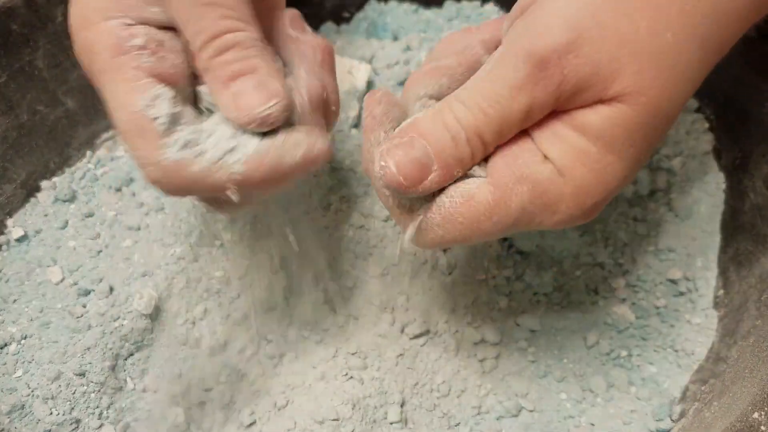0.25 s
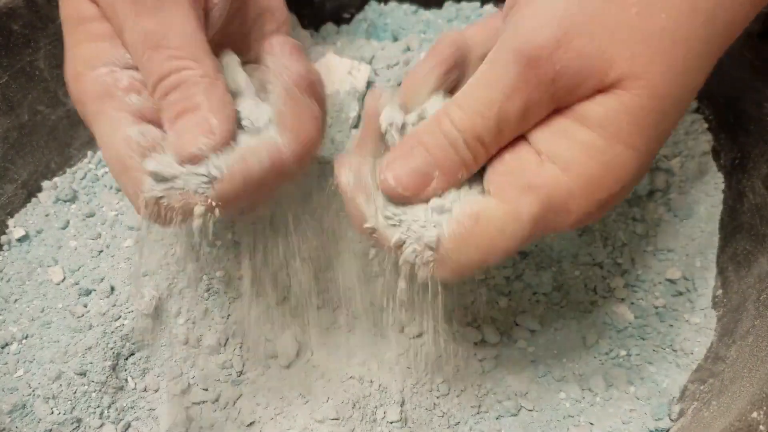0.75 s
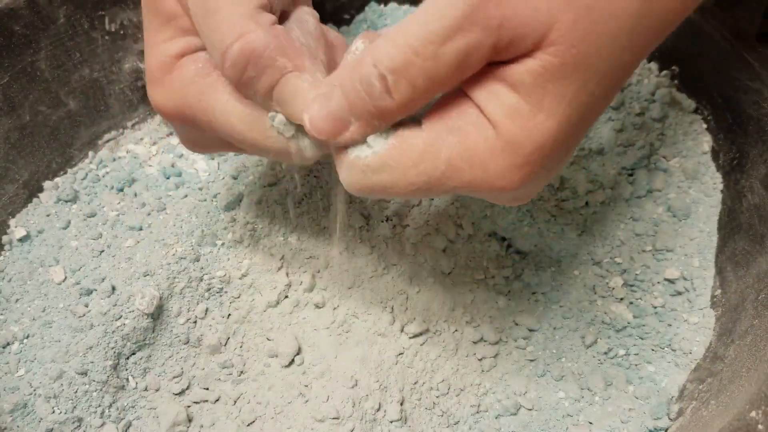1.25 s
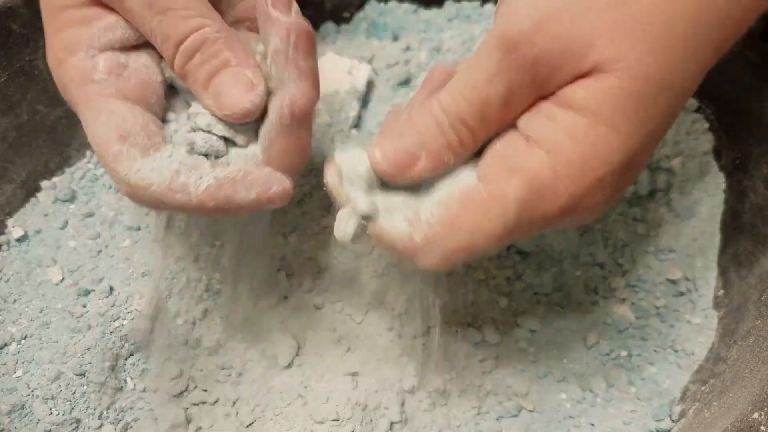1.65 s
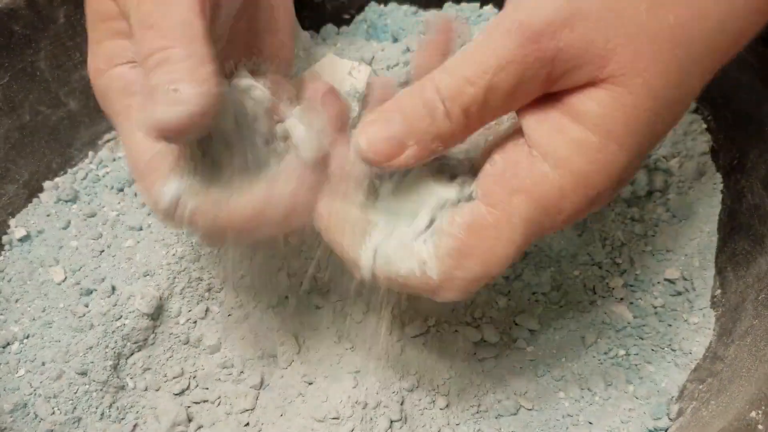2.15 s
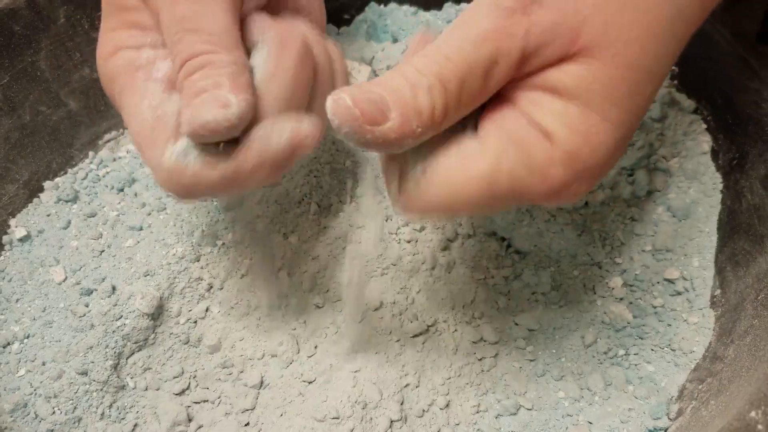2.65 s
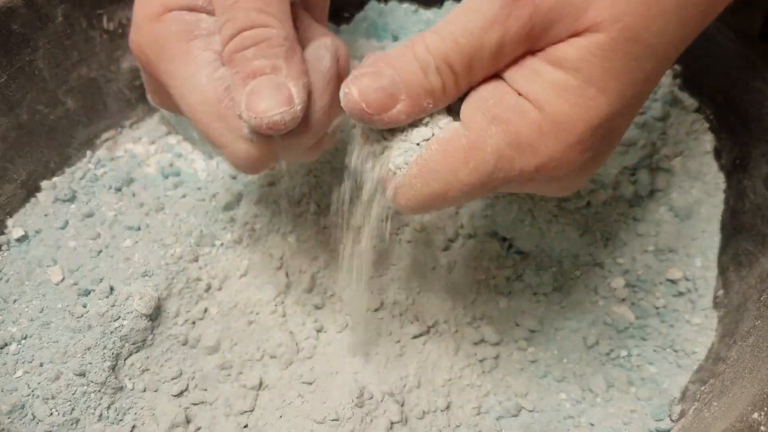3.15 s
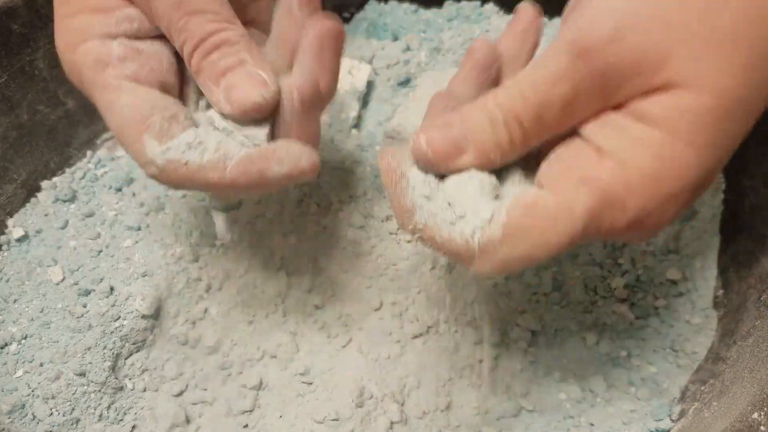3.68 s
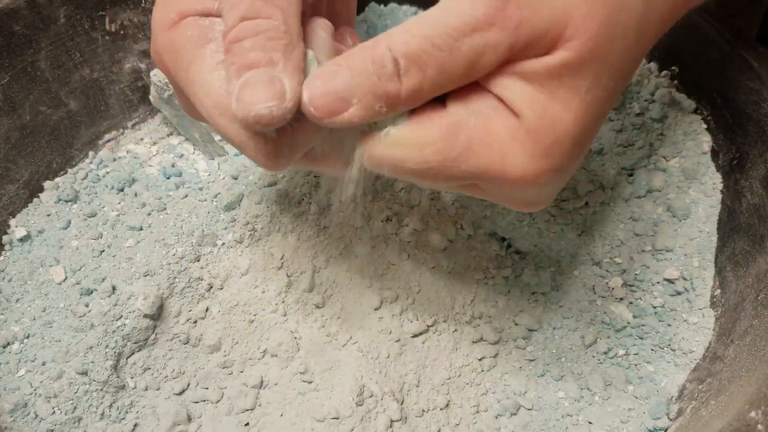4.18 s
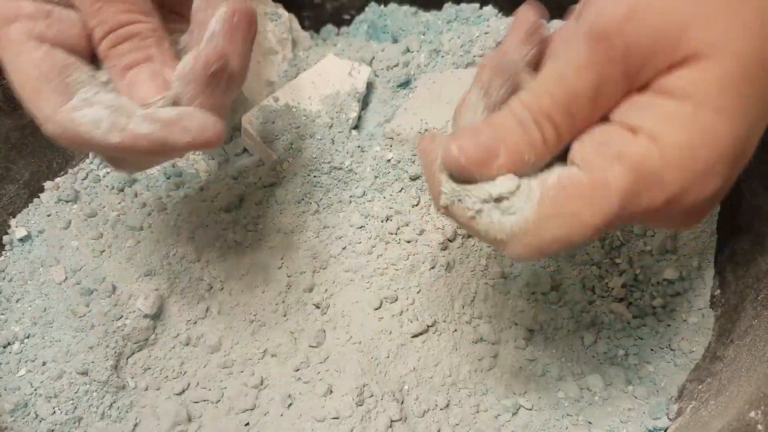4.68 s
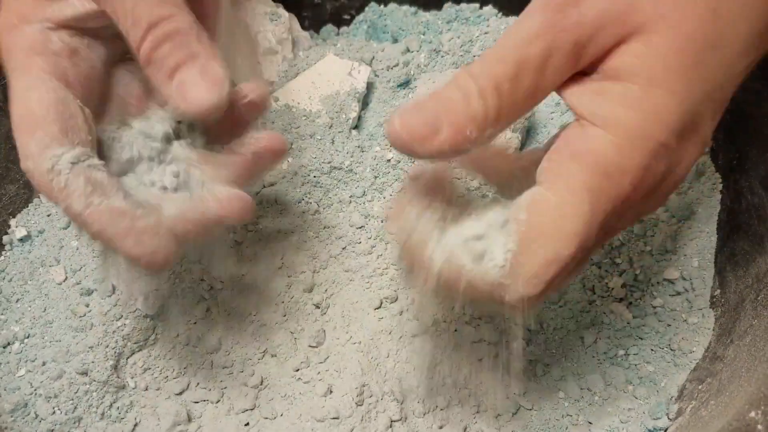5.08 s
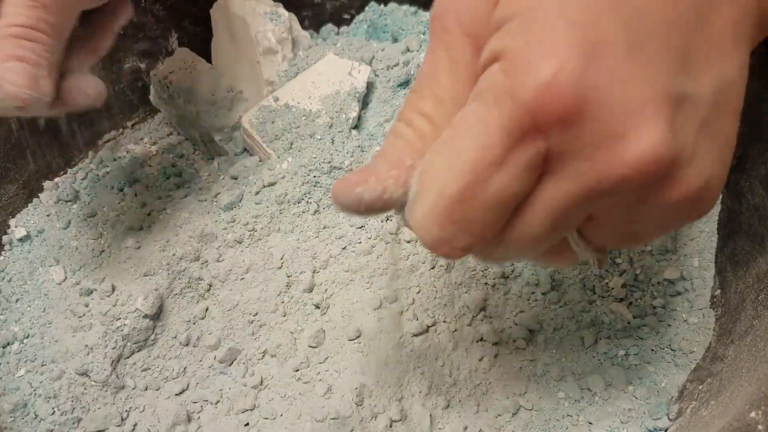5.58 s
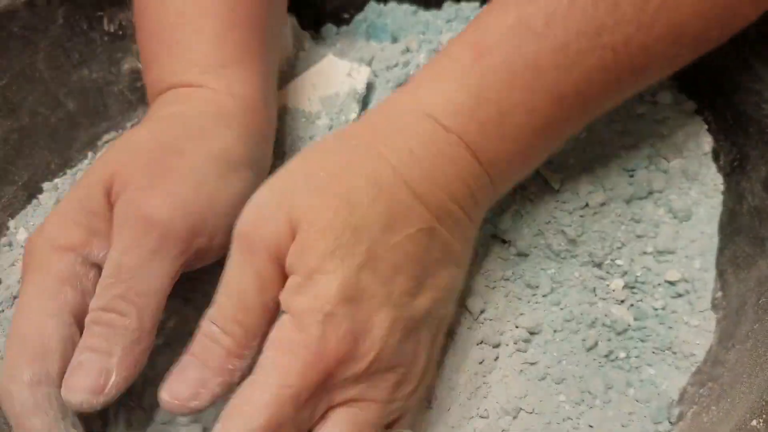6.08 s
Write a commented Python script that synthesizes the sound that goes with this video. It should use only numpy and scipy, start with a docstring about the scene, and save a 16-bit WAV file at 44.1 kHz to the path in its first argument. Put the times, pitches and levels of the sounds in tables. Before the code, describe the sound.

Dry chalky lumps snap and crumble between fingers over a bowl, with gritty crackles and sifting powder, ending in a broad, low scraping sweep.

```python
"""Chalk crumbled over a bowl

Hands crumble soft chalk close to a small microphone in a small room. Lumps snap as noise through a resonance,
each answered by a fading smear of noise; crumbs tick and crackle as short bursts and decaying tones.
Grinding, sifting, settling and bowl rumble are gritty coloured noise under level curves; bumps are decaying sines.
At the end both palms plough through the heap, stirring up hiss and rumble.
"""
import sys
import numpy as np
from scipy import signal
from scipy.fft import rfft, irfft, next_fast_len
from scipy.io import wavfile
from scipy.ndimage import map_coordinates

SR = 44100
rng = np.random.default_rng(int(sys.argv[2]) if len(sys.argv) > 2 else 0)


def bounce(signal):
    """Save signal as a 16-bit WAV file at the path given by the first command-line argument."""
    frames = np.transpose(np.atleast_2d(signal))
    limited = np.clip(frames, -1, 1)
    pcm = np.round(limited * 32767).astype(np.int16)
    wavfile.write(sys.argv[1], SR, pcm)


N = 279153


def amp(db):
    """Decibels to gain."""
    return 10 ** (np.asarray(db) / 20)


def unit(x):
    """Scale to rms 1."""
    return x / np.sqrt(np.mean(x ** 2) + 1e-20)


def peak(x):
    """Scale each row to peak 1."""
    return x / np.abs(x).max(axis=1, keepdims=True)


def gain_at(points, hz):
    """Gain of (Hz, dB) points, interpolated over log frequency."""
    point_hz, db = np.transpose(points)
    return amp(np.interp(np.log(hz + 1), np.log(point_hz + 1), db))


def causal(points):
    """Minimum-phase response with the gain of the points: nothing sounds before its cause."""
    def response(hz):
        cepstrum = irfft(np.log(gain_at(points, hz) + 1e-6))
        half = len(cepstrum) // 2
        fold = np.r_[1, 2 * np.ones(half - 1), 1, np.zeros(len(cepstrum) - half - 1)]
        return np.exp(rfft(cepstrum * fold))
    return response


def resonance(hz, width_hz):
    """Band-pass resonance applied twice: steep flanks, ringing of a few cycles."""
    def response(f):
        damping = 1j * f * width_hz
        return (damping / (hz ** 2 - f * f + damping)) ** 2
    return response


def filtered(x, response):
    """Apply a frequency response along the last axis, zero-padded."""
    size = 2 * next_fast_len(x.shape[-1] // 2 + 2048)
    spectrum = rfft(x, size) * response(np.fft.rfftfreq(size, 1 / SR))
    return irfft(spectrum, size)[..., :x.shape[-1]]


def curves(rows):
    """One value per sample for each column after the time."""
    time_s, *columns = np.transpose(rows)
    return [np.interp(np.arange(N) / SR, time_s, column) for column in columns]


def wobble(knots_per_s):
    """Smooth random curve through normal-distributed knots."""
    knots = rng.standard_normal(int(N * knots_per_s / SR) + 4)
    return map_coordinates(knots, [np.arange(N) * knots_per_s / SR])


def place(rows, times_s):
    """Add each row of sound at its time."""
    out = np.zeros(N + rows.shape[1])
    for row, time_s in zip(rows, times_s):
        out[round(time_s * SR):][:len(row)] += row
    return out[:N]


def gritty(spectrum, per_s, spread_db, grain_db, life_s, wobble_db):
    """Coloured friction noise of rms 1 whose level leaps briefly as single crumbs break."""
    grain_level_db = grain_db + spread_db * np.minimum(rng.exponential(size=N), 3)
    breaks = (rng.random(N) < per_s / SR) * amp(grain_level_db)
    leaps = signal.lfilter([1], [1, -np.exp(-1 / (life_s * SR))], breaks)
    drag = amp(wobble_db * wobble(30))
    noise = rng.standard_normal(N) * (drag + leaps)
    return unit(filtered(noise, lambda hz: gain_at(spectrum, hz)))


# both palms sweeping the heap: (time [s], level [dB])
PLOUGH_LEVELS = [(5.77, -79), (5.816, -34), (5.888, -35.5), (5.99, -36), (6.062, -39.5), (6.136, -36.5),
                 (6.252, -39), (6.274, -52), (6.33, -51)]


def plough_gain():
    """Gain of the palms' sweep, silent until they land."""
    landed = np.arange(N) > PLOUGH_LEVELS[0][0] * SR
    return landed * amp(curves(PLOUGH_LEVELS)[0])


# bowl shaking under the fingers: (time [s], level [dB])
RUMBLE_LEVELS = [(0.0, -55), (0.35, -51), (0.97, -62), (1.29, -61), (1.5, -55), (2.03, -53.5),
                 (2.17, -59.5), (2.43, -49.5), (2.7, -58), (3.31, -56), (4.0, -57.5), (4.2, -63),
                 (4.74, -53), (4.95, -63.5), (5.3, -51), (5.7, -59.5), (6.33, -61)]
# bowl shake spectrum: (frequency [Hz], relative density [dB])
BOWL_SPECTRUM = [(26, 6), (45, 0), (65, -0.5), (119, 7.5), (195, -6.5), (273, -7), (337, -3.5), (401, -19),
                 (450, -22.5), (580, -45), (990, -120)]


def rumble():
    """Low shaking of the bowl under the fingers, plus the shake stirred up by the sweep."""
    shake = gritty(BOWL_SPECTRUM, per_s=5, spread_db=2, grain_db=2, life_s=.015, wobble_db=1)
    plough_shake_db = -3.5  # re sweep level
    return (amp(curves(RUMBLE_LEVELS)[0]) + amp(plough_shake_db) * plough_gain()) * shake


# powder spurts as the fingers open: (time of the peak [s], level [dB], fall to 1/e [s])
SPURT_EVENTS = [(0.15, -62, 0.027), (0.267, -47, 0.011), (0.336, -51, 0.069), (0.409, -45.5, 0.027),
                (0.63, -48, .06), (1.29, -49.5, 0.039), (1.357, -53.5, .025), (1.736, -51, 0.024),
                (1.796, -47, 0.0096), (1.908, -57, 0.033), (2.0, -46, .06), (2.12, -49.5, 0.053),
                (2.33, -53.5, 0.031), (2.425, -45, 0.016), (2.704, -54.5, .03), (3.11, -66, 0.016),
                (3.242, -49.5, 0.021), (3.517, -50.5, 0.019), (3.646, -54, 0.011), (3.74, -52, 0.057),
                (3.973, -41.5, 0.013), (4.182, -54.5, .03), (4.26, -58.5, .05), (4.459, -48.5, 0.042),
                (4.682, -56, 0.079), (4.865, -57, 0.03), (4.957, -49.5, 0.051), (5.058, -53, 0.044),
                (5.617, -45.5, 0.012), (5.697, -54, 0.029)]


def spurt_gain():
    """Gain of the powder's spurts: each swells to its peak and thins out more slowly."""
    time_s, db, fall_s = np.transpose(SPURT_EVENTS)[:, :, None]
    lag_s = np.arange(N) / SR - time_s
    width_s = np.where(lag_s < 0, 0.29 * fall_s, fall_s)
    return np.sum(amp(db) * np.exp(-(lag_s / width_s) ** 2), axis=0)


# trickle of powder, swelling and thinning: (time [s], level [dB])
TRICKLE_LEVELS = [(0.0, -59.5), (.28, -59), (0.55, -55), (0.74, -59), (1.0, -63), (1.22, -75),
                  (1.46, -63.5), (1.74, -59), (1.97, -54.5), (2.26, -63), (2.45, -54.5), (2.8, -58.5),
                  (3.45, -57), (3.6, -65), (3.86, -57), (4.09, -69), (4.3, -59), (4.56, -64.5), (4.81, -53),
                  (5.02, -53.5), (5.15, -68), (5.24, -55.5), (5.5, -56.5), (5.57, -64.5), (5.67, -50.5),
                  (5.77, -58.5), (6.33, -74)]
# sifting hiss spectrum, also colours the ticks: (frequency [Hz], relative density [dB])
SIFT_SPECTRUM = [(2060, -3.5), (3500, -3.5), (4840, -4.5), (5260, -7.5), (5900, -9), (8310, -18.5),
                 (10900, -6), (11700, -6), (14200, -12), (16000, -20)]


def sifting():
    """Fine powder hiss: trickle, spurts and the hiss stirred up by the sweep share one noise."""
    hiss = gritty(SIFT_SPECTRUM, per_s=130, spread_db=4.0, grain_db=0.0, life_s=0.00057, wobble_db=-1.0)
    plough_hiss_db = -9  # re sweep level
    stirred = spurt_gain() + amp(plough_hiss_db) * plough_gain()
    return np.hypot(amp(curves(TRICKLE_LEVELS)[0]), stirred) * hiss


# fingers at work: (time [s], crumbs grinding level [dB], powder settling level [dB])
HAND_LEVELS = [(0.0, -56.5, -57.5), (0.18, -58, -60.5), (0.33, -48, -48), (0.5, -65, -46),
               (0.62, -64, -62.5), (0.9, -56.5, -56), (1.12, -71, -64.5), (1.78, -65.5, -62),
               (1.92, -44.5, -47.5), (2.23, -60.5, -55.5), (2.69, -59.5, -62.5), (3.14, -60.5, -53.5),
               (4.22, -65.5, -67.5), (4.66, -66, -56), (4.81, -51.5, -51.5), (5.0, -62, -61),
               (5.72, -57, -60.5), (5.85, -93, -79)]
# settling spectrum: (frequency [Hz], relative density [dB])
HEAP_SPECTRUM = [(210, -31), (350, 3), (507, -11), (649, 0.5), (710, -6.5), (1050, -7), (1800, -7),
                 (2040, -11.5), (2500, -13.5), (3250, -5.5), (5500, -120)]


def settling():
    """Powder settles on the heap: sparse, longer grains of low-pitched noise."""
    noise = gritty(HEAP_SPECTRUM, per_s=34, spread_db=1.5, grain_db=8.5, life_s=0.0038, wobble_db=4.0)
    return amp(curves(HAND_LEVELS)[1]) * noise


# grinding spectrum: (frequency [Hz], relative density [dB])
GRIND_SPECTRUM = [(710, -44), (1200, -50), (1790, 7), (2130, -9), (2320, 8), (2660, 10), (3670, -21),
                  (4680, -5.5), (6000, -21), (7800, -19), (13200, -120)]


def grinding():
    """Crumbs grind between the fingers: friction noise with short grains."""
    noise = gritty(GRIND_SPECTRUM, per_s=120, spread_db=4.0, grain_db=8, life_s=0.001, wobble_db=2.5)
    return amp(curves(HAND_LEVELS)[0]) * noise


# sweep spectrum: (frequency [Hz], relative density [dB])
PLOUGH_SPECTRUM = [(210, -21), (350, -8), (415, -15.5), (546, 0.5), (799, -2.5), (1110, 0), (1460, -6),
                   (1820, -4), (3690, -13.5), (4800, -18.5), (8000, -29), (10400, -47), (17600, -120)]


def ploughing():
    """Both palms sweep the heap: broad friction noise of dense, weak grains."""
    noise = gritty(PLOUGH_SPECTRUM, per_s=270, spread_db=1.0, grain_db=-4.5, life_s=0.00092, wobble_db=0.7)
    return plough_gain() * noise


def crumbs():
    """Lesser crumbs crack at random, level following the grinding, each ringing a few cycles at its pitch."""
    per_s, over_grind_db, spread_db = 40, 13, 4
    when, size, tone = rng.random((250, 3)).T[:, :, None]
    time_s = np.cumsum(-np.log(when + 1e-9), axis=0) / per_s % (N / SR)
    grind_db = curves(HAND_LEVELS)[0][(time_s * SR).astype(int)]
    db = grind_db + over_grind_db - spread_db * np.log(size + .05)
    t = np.arange(SR // 100) / SR
    pitch_hz = 1500 * (1 + 2.6 * tone)
    decay_db = -60 * t * pitch_hz / 7  # 60 dB in 7 cycles
    return place(amp(db + decay_db) * np.sin(2 * np.pi * pitch_hz * t), time_s[:, 0])


# dull bumps of the bowl: (time [s], peak level [dB], pitch [Hz])
BUMP_EVENTS = [(0.402, -25.5, 118), (1.473, -38.5, 126), (1.978, -28, 125), (4.264, -37, 123),
               (5.807, -28, 208), (5.858, -30.5, 127), (5.99, -24.5, 103), (6.118, -27.5, 98),
               (6.215, -40, 141)]


def bumps():
    """The bowl swings a few slow cycles after each push."""
    time_s, db, pitch_hz = np.transpose(BUMP_EVENTS)[:, :, None]
    t = np.arange(int(.2 * SR)) / SR
    onset = 1 - np.exp(-t / 0.0024)
    decay = amp(-60 * t * pitch_hz / 8)  # 60 dB in 8 cycles
    swing = np.sin(2 * np.pi * pitch_hz * t) * decay * onset
    return place(amp(db) * peak(swing), time_s[:, 0])


# single hard crumbs: (time [s], peak level [dB])
TICK_EVENTS = [(1.2175, -55), (1.3312, -33.5), (1.356, -46), (1.7318, -30), (1.829, -33), (1.9356, -38),
               (2.0864, -48), (2.427, -32), (2.7646, -45), (2.7835, -45), (3.0063, -37), (3.0835, -41),
               (3.4497, -39), (3.714, -41), (4.052, -43), (4.109, -47), (4.4358, -48), (4.5817, -48),
               (5.1617, -58), (5.249, -46)]


def ticks():
    """A crumb splits: a millisecond-scale noise burst in the colour of the sifting."""
    time_s, db = np.transpose(TICK_EVENTS)[:, :, None]
    t = np.arange(SR // 50) / SR
    split = rng.standard_normal((len(TICK_EVENTS), len(t))) * amp(-60 * t / .004)
    return place(amp(db) * peak(filtered(split, causal(SIFT_SPECTRUM))), time_s[:, 0])


# lumps snapping: (time [s], lump peak level [dB], lump pitch [Hz], bandwidth re pitch, clipped to 0.2-3 [1],
# sharp edge re lump [dB], thud in the bowl re lump [dB], room echo re burst [dB])
SNAP_EVENTS = [(0.099, -35, 4100, 0.25, -25, -21, -31), (0.122, -33, 2420, 1.4, 1, -1, -17),
               (0.146, -22.5, 2720, 1.36, -10, -3, -28), (0.184, -40, 815, 4.3, -3, 6, -33),
               (0.196, -33, 850, 2.9, -14, -26, -22), (0.264, -22.5, 2100, 2.9, -20, -20, -22),
               (0.31, -34.5, 821, 3.9, 2, 0.5, -21), (0.335, -29, 3160, .9, -26, -30, -23),
               (0.373, -27.5, 2600, 0.33, -10, -8, -24), (0.407, -19, 2630, 0.29, -12.5, -8, -29),
               (0.456, -28, 2430, 1.8, -28, -25, -29), (0.474, -32, 2380, 1.3, -30, -37, -17),
               (0.505, -24, 2300, 0.79, -30, -28, -18), (0.526, -31.5, 2280, 2.5, -23, -13, -21),
               (0.618, -14.5, 2730, 1.7, -10.5, -37, -26), (0.686, -23, 1770, 2.1, -12, -29, -18.5),
               (0.912, -45.5, 2740, 1.9, -22, 4, -38), (1.276, -34.5, 3140, 0.92, 1.5, -8.5, -12.5),
               (1.421, -16.5, 1410, 3.4, -23, -15, -21.5), (1.464, -26, 1700, 0.93, -41, -17.5, -16),
               (1.512, -33.5, 1650, 1.3, -29, -12, -18), (1.718, -30, 1210, 1.9, -25, 1, -20.5),
               (1.74, -32.5, 840, 4.1, -11, -23, -21), (1.772, -29, 1660, 1.2, -27, -16, -19),
               (1.795, -27.5, 2620, 0.98, -11, -10, -17), (1.838, -33, 2600, 1.9, -11, -23, -17),
               (1.858, -32, 2800, 1.6, -6, -12, -19), (1.894, -28, 2700, 4.3, -4, -8, -19),
               (1.915, -23.5, 1150, 0.42, -4.5, -13, -14), (1.945, -9, 1120, 0.58, -19, -12, -25),
               (1.993, -20, 2650, 3.9, -11, -9, -23), (2.073, -8, 1300, 1.54, -45, -14, -17.5),
               (2.16, -33.5, 787, 1.3, -11, -5, -12), (2.286, -40, 2270, 0.49, 2, -5, -27),
               (2.315, -20.5, 2470, 1.9, -23, -8.5, -11.5), (2.339, -30, 2580, 1.9, -4, -23, -21),
               (2.381, -31, 1110, 0.22, -30, -31, -12), (2.406, -20.5, 1310, 1.3, -38, -22, -17),
               (2.463, -37.5, 1100, 1.5, -1, 2, -20), (2.508, -29, 2820, 0.29, -34, -12, -20),
               (2.77, -36.5, 2500, 3.4, -6, -12, -36), (2.97, -37, 1950, 2.1, 0, -2.5, -35),
               (3.032, -36.5, 2710, 2.2, -4, -8, -21), (3.072, -37, 2400, .7, -4, -11, -18),
               (3.099, -27, 2840, 0.91, -11, -13, -25), (3.127, -39, 2350, 1.2, -12, -24, -30),
               (3.215, -28.5, 2620, 0.22, -28, -35, -22), (3.239, -29, 2330, 0.81, -12, -28, -14),
               (3.336, -33, 2200, 1.7, -10, -9.5, -16.5), (3.629, -20.5, 880, 7.1, -7, -29, -20),
               (3.81, -35, 3120, 0.72, 0, -15.5, -17), (3.965, -25.5, 1760, 1.13, -3.5, -4.5, -16.5),
               (4.149, -37, 2470, 3.3, -23, -5.5, -18.5), (4.187, -34, 3030, 3.6, 2, -3, -18.5),
               (4.269, -36.5, 2770, 1.3, -4, -11, -12.5), (4.338, -37, 2870, 1.3, -0.5, -20, -24),
               (4.467, -37.5, 2350, .6, 0, -20, -20), (4.632, -5, 1710, 1.02, -20.5, -29, -16),
               (4.757, -36.5, 1240, 0.69, -6, -24, -21), (4.777, -29.5, 1520, 1.5, -17, -24, -21),
               (4.84, -24, 2100, 1.4, -3.5, -15, -11.5), (4.927, -36, 3160, 1.6, -11, -6.5, -14),
               (4.94, -21.5, 2150, 0.75, -28, -19.5, -23.5), (5.104, -33, 2380, 2.8, -25, -9.5, -46),
               (5.212, -14.5, 1110, 1.56, -35, -15, -19.5), (5.325, -32, 2340, 3, -31, -9, -19),
               (5.352, -29.5, 2420, 2.9, -19, -33, -17.5), (5.383, -34.5, 3020, 2, -4, -21, -18),
               (5.504, -27, 890, 4.4, -8, -23, -28), (5.591, -50, 2440, 1, -1, -25, -20),
               (5.602, -36, 1980, 3.5, 3, -25, -20), (5.79, -39, 1290, .9, -21, -20, -19),
               (5.809, -17.5, 1210, 0.41, -26, -11.5, -15), (5.853, -21.5, 1043, 0.22, -12, -11, -10.5),
               (6.138, -24, 1820, 1.4, -19, -20, -5.5), (6.184, -25, 930, 1.6, -28, -21, -20),
               (6.282, -19, 1700, 1.45, -7.5, -12.5, -18)]
# colour of bowl and close microphone on the lump: (frequency [Hz], gain [dB])
CUP_RESPONSE = [(200, 4), (420, -3.5), (580, 8), (900, 0), (1200, 2), (2100, -4.5), (2700, 0.5), (3300, -7),
                (3900, -13.5), (8000, -19.5)]
# colour of the sharp edge: (frequency [Hz], gain [dB])
EDGE_RESPONSE = [(300, 4), (1200, -12), (2700, -8), (4200, 10), (6500, 2), (8200, -9.5), (11500, 1),
                 (16000, -27)]


def snaps():
    """A lump fails in a few cycles at its pitch, with sharp edge and low push; the room returns a smear."""
    columns = np.transpose(SNAP_EVENTS)[:, :, None]
    time_s, db, pitch_hz, looseness, edge_db, thud_db, echo_db = columns
    t = np.arange(int(.4 * SR)) / SR
    noise = rng.standard_normal((len(SNAP_EVENTS), 2, len(t)))

    nearest_wall = 1 + 0.5 * np.exp(-((t - .013) / 0.0039) ** 2)
    room = amp(echo_db) * (1 - np.exp(-t / 0.0044)) * nearest_wall
    tearing = 1 - np.exp(-t / 0.00026)  # the crack runs through the lump
    burst = noise[:, 0] * (tearing * amp(-60 * t / 0.013) + room * amp(-60 * t / 0.24))

    width_hz = np.clip(looseness, .2, 3) * pitch_hz
    lump = filtered(filtered(burst, resonance(pitch_hz, width_hz)), causal(CUP_RESPONSE))
    edge_envelope = tearing * amp(-60 * t / .006) + room * amp(-9 - 60 * t / .15)
    edge = filtered(noise[:, 1] * edge_envelope, causal(EDGE_RESPONSE))

    hollow = filtered(burst, resonance(641, 476))
    push = np.sin(2 * np.pi * 270 * t) * amp(-60 * t / 0.028)  # on the palm
    thud = peak(hollow) + amp(-2.5) * push
    parts = peak(lump) + amp(edge_db) * peak(edge) + amp(thud_db) * thud
    return place(amp(db) * parts, time_s[:, 0])


def scene():
    """All sources at one microphone."""
    background = rumble() + sifting() + settling()
    hands = grinding() + ploughing() + crumbs()
    return (background + hands + bumps() + ticks() + snaps())[None]


# faint subsonic murmur: (frequency [Hz], relative density [dB])
MURMUR_SPECTRUM = [(8, 3), (25, 15), (45, -62), (80, -73)]


def record(dry):
    """The microphone drops the deepest bass; its electronics add murmur and offset; then the band limit."""
    low_cut_hz, top_hz, murmur_db, offset = 60, 15800, -63, -.0005
    heard = filtered(dry, lambda hz: (1j * hz / (low_cut_hz + 1j * hz)) ** 2)
    murmur = unit(filtered(rng.standard_normal(N), lambda hz: gain_at(MURMUR_SPECTRUM, hz)))
    return filtered(heard + amp(murmur_db) * murmur + offset, lambda hz: hz < top_hz)


dry = scene()
out = record(dry)
bounce(out)
```